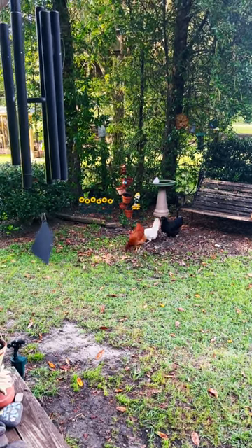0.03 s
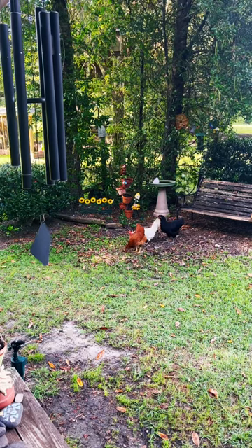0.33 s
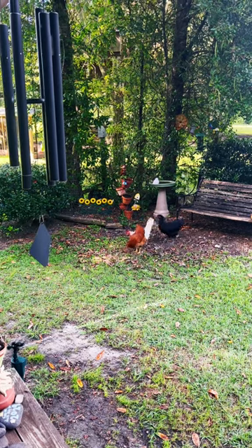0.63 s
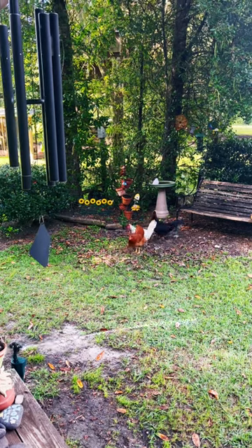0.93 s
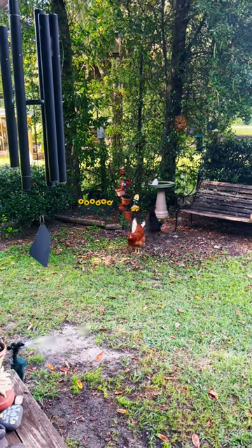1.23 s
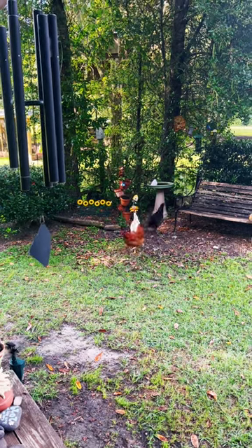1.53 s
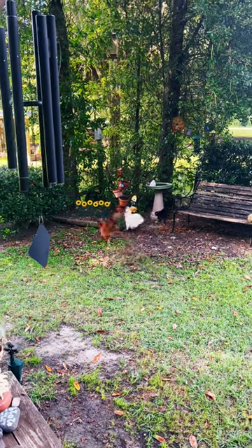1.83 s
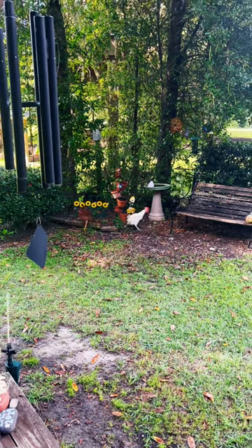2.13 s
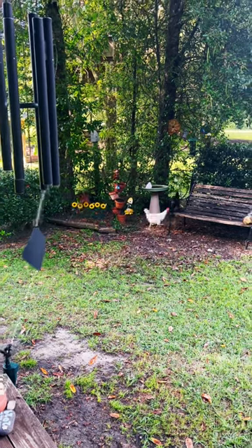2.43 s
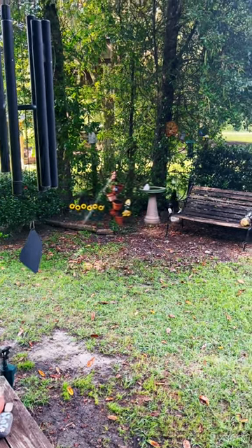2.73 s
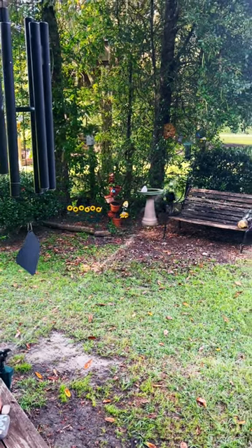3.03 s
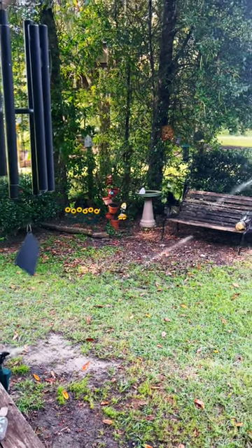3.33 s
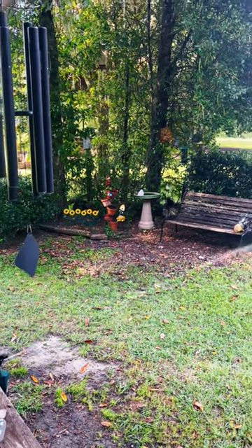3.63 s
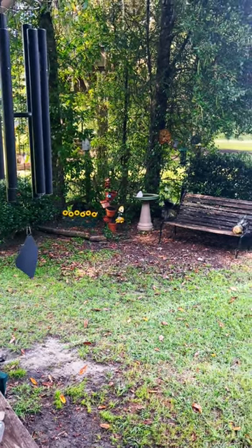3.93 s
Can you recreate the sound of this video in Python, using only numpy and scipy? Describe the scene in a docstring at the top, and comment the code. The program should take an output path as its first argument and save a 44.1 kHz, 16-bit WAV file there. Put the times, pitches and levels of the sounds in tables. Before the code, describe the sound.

An impact sprinkler starts with a clunk and a spurt on a backyard lawn, then ticks steadily over hissing water. It rattles quickly back in louder spray and resumes ticking. Drops patter on grass over a low rumble.

```python
"""A clunk and a spurt, over a low rumble and hum, as water enters an impact sprinkler on a back lawn.
Its sprung arm cuts the hissing jet and strikes the metal head about ten times a second; each impact
gives a click, a short ring and a burst of spray. A lever snaps over, the arm rattles quickly while
the head swings back, then the lever snaps again and the slow beat resumes. Drops patter on the grass."""
import sys
import numpy as np
from scipy import signal
from scipy.fft import rfft, irfft
from scipy.io import wavfile

SR = 44100
rng = np.random.default_rng(int(sys.argv[2]) if len(sys.argv) > 2 else 0)


def wav_out(sig):
    """Save sig, one row per channel (or a flat mono array), as 16-bit PCM at SR to the path in sys.argv[1]."""
    wavfile.write(sys.argv[1], SR, np.round(np.clip(np.atleast_2d(sig).T, -1, 1) * 32767).astype(np.int16))


N = 176400
TIME, BIN_HZ = np.arange(N) / SR, np.fft.rfftfreq(N, 1 / SR)

# slow blows of the arm: (time [s], relative click level [dB], ring level [dB], splash level [dB])
SLOW_BLOWS = [(0.3718, -27.5, -31.5, -34), (0.4629, -30, -30, -34), (0.5573, -28, -31, -31.5),
              (0.6506, -27.5, -29.5, -33), (0.744, -26, -34, -34.5), (0.8378, -25, -33, -34.5),
              (0.9305, -25, -33.5, -36), (1.0233, -23.5, -35.5, -32.5), (1.1177, -27.5, -38.5, -33),
              (1.6295, -23.5, -36, -32.5), (1.7218, -27.5, -37, -35), (1.817, -24, -38, -35),
              (1.9111, -27.5, -39, -35), (2.0057, -26, -37.5, -35), (2.1, -29, -36, -33.5),
              (2.1943, -25.5, -36, -35), (2.2882, -27.5, -36.5, -33), (2.3818, -26, -34, -34.5),
              (2.4756, -25.5, -34.5, -34), (2.5694, -24.5, -32, -33.5), (2.6634, -24.5, -33.5, -34),
              (2.7576, -27, -34, -36.5), (2.8521, -23.5, -33, -38.5), (2.9463, -24.5, -32, -33.5),
              (3.0402, -26, -33, -33), (3.1343, -22.5, -32, -36), (3.2284, -23, -32.5, -34),
              (3.3226, -23.5, -32, -34.5), (3.4167, -23, -33, -35), (3.5112, -21.5, -32.5, -34.5),
              (3.6056, -24.5, -31.5, -33.5), (3.6994, -27, -32, -33.5), (3.7939, -32, -32, -35.5),
              (3.8877, -33, -33, -32.5), (3.9824, -27.5, -33, -31.5)]
# quick blows while the head swings back: (time [s], relative click level [dB])
QUICK_BLOWS = [(1.1436, -26), (1.1672, -40), (1.1914, -28), (1.2148, -30), (1.237, -28.5), (1.2596, -29),
               (1.2831, -33), (1.3057, -29), (1.3292, -37), (1.352, -39), (1.3745, -41), (1.3962, -38),
               (1.42, -33), (1.4402, -37), (1.4625, -39), (1.4864, -35), (1.5082, -34)]
# snaps of the reversing lever: (time [s], relative click level [dB], splash level [dB])
LEVER_TRIPS = [(1.119, -24.5, -45), (1.5307, -21, -36.5)]
# the clunk as the water comes in: (time [s], relative knock level [dB], splash level [dB])
INLET_CLUNK = (.2358, -27, -45)


def amp(db):
    """Amplitude ratio of a level in decibels."""
    return 10 ** (np.asarray(db) / 20)


def unit(x):
    """Normalisation to an rms of one."""
    return x / np.sqrt(np.mean(x ** 2) + 1e-20)


def gain_curve(points):
    """Gain at each frequency bin, by interpolation of levels on a log-frequency axis."""
    hz, db = np.transpose(points)
    return amp(np.interp(np.log(BIN_HZ + 1), np.log(hz + 1), db))


def filtered(x, gain):
    """Linear filtering: the spectrum is multiplied by a gain, and the result has an rms of one."""
    return unit(irfft(rfft(x) * gain))


def drift(rate_hz):
    """Random fluctuation: low-pass Gaussian noise with an rms of one."""
    return filtered(rng.standard_normal(N), np.exp(-(BIN_HZ / rate_hz) ** 2))


def add(mix, s, sound):
    """Superposition of a sound on the mix, starting at s seconds."""
    part = mix[max(round(s * SR), 0):][:len(sound)]
    part += sound[:len(part)]


def struck(modes, spread_db, detune=0):
    """Free vibration: a sum of damped modes whose levels and tuning may vary from blow to blow."""
    t = np.arange(SR // 5) / SR
    out = np.zeros(len(t))
    for k, (hz, db, t60) in enumerate(modes):
        level_chance, pitch_chance = rng.standard_normal(2)
        envelope = amp(db + spread_db * level_chance - 60 * t / t60)
        out += (-1) ** k * envelope * np.sin(2 * np.pi * hz * (1 + detune * pitch_chance) * t)
    return out


def water_hiss(spectrum, grain_db, grain_hz, correlation=.7):
    """Breaking water radiates grainy, amplitude-modulated noise, partly coherent at two microphones."""
    a, b = rng.standard_normal((2, N))
    pair = np.array([a, correlation * a + np.sqrt(1 - correlation ** 2) * b])
    return filtered(pair * amp(grain_db * drift(grain_hz)), gain_curve(spectrum))


def background():
    """Low outdoor noise, and a distant machine's hum: partials modulated in amplitude and frequency."""
    # outdoor rumble: (frequency [Hz], relative spectral level [dB])
    rumble_spectrum = [(20, -41), (36, -29), (52, 2.5), (72, -0.5), (105, -0.5), (135, -6.5), (210, -2.5),
                       (275, -12.5), (350, -6), (480, -18.5), (1100, -22.5), (1500, -33.5), (2000, -40.5),
                       (4000, -41), (15000, -53)]
    # partials of the hum: (frequency [Hz], level [dB], rms frequency deviation [Hz])
    partials = [(57.7, -49, 2.91), (115.5, -59, 3.94), (169.8, -61.5, 1.62), (237.6, -53.5, 1.26),
                (345, -62.5, 4.86), (598, -70.5, 2.25), (932, -69, 1.7)]
    hum = np.zeros(N)
    for hz, db, waver_hz in partials:
        peak = np.sqrt(2) * amp(db + 2.3 * drift(10))
        hum += peak * np.sin(2 * np.pi * np.cumsum(hz + waver_hz * drift(8)) / SR)
    return hum + amp(-46) * filtered(rng.standard_normal((2, N)), gain_curve(rumble_spectrum))


def patter(drops_per_s=900, spread_db=4, fall_s=.007):
    """Shot noise: drops land on grass and leaves at random, each a brief decaying burst."""
    # drops on the lawn: (frequency [Hz], relative spectral level [dB])
    spectrum = [(250, -1.5), (500, -4), (780, 3), (1050, -3), (1400, 0), (2000, -4), (2700, -7),
                (5000, -19.5), (15000, -37)]
    # strength of the patter: (time [s], relative level [dB])
    levels = [(.15, -8.5), (.4, -3.5), (.6, -3), (1.1, 0), (1.29, 2), (1.35, 5.5), (1.52, 10), (1.58, 0.5),
              (2.5, -1.5), (3.0, 2), (3.55, -2), (4, -3.5)]
    impacts = (rng.random((2, N)) < drops_per_s / SR) * rng.standard_normal((2, N))
    impacts *= amp(spread_db * np.minimum(rng.exponential(1, (2, N)), 3))
    t = np.arange(SR // 50) / SR
    burst = rng.standard_normal((2, len(t))) * np.exp(-t / fall_s)
    drops = signal.fftconvolve(impacts, burst, axes=1)[:, :N]
    clumps = amp(np.interp(TIME, *np.transpose(levels)) + 2.6 * drift(27))
    return amp(-55.5) * clumps * filtered(drops, gain_curve(spectrum))


def splats(rise_s=.002, width_octaves=.6):
    """Larger gouts of water strike leaves and soil; each impact is a transient of band-limited noise."""
    # gouts landing: (time [s], level [dB], centre frequency [Hz], decay time constant [s])
    gouts = [(1.685, -40.5, 1300, 0.006), (1.880, -44, 1000, 0.0051), (1.957, -41.5, 1800, 0.013),
             (1.960, -43.5, 700, 0.0059), (2.535, -48, 1400, .014), (2.985, -44, 1150, 0.015),
             (3.540, -47, 856, 0.022)]
    out, t, hz = np.zeros((2, N)), np.arange(8192) / SR, np.fft.rfftfreq(8192, 1 / SR)
    for s, db, centre_hz, fall_s in gouts:
        band = np.exp(-.5 * (np.log2((hz + 1) / centre_hz) / width_octaves) ** 2)
        envelope = amp(db) * np.minimum(t / rise_s, 1) * np.exp(-t / fall_s)
        for channel in out:
            add(channel, s, envelope * filtered(rng.standard_normal(len(t)), band))
    return out


def jet(water_on_s=.31, rise_s=1, ring_on_s=.37, ring_hz=3460, ring_width_hz=174):
    """Jet noise grows as pressure builds; the nozzle whistles faintly in a narrow band."""
    # the free jet: (frequency [Hz], relative spectral level [dB])
    spectrum = [(300, -4), (1000, -3.5), (1900, -1), (2700, 9.5), (3350, 9.5), (4000, 4.5), (5200, 4.5),
                (6300, -6), (7800, 7), (9000, -6.5), (13000, -1), (15600, -49)]
    resonance = np.exp(-.5 * ((BIN_HZ - ring_hz) / ring_width_hz) ** 2)
    ring = amp(-53) * (TIME > ring_on_s) * filtered(rng.standard_normal((2, N)), resonance)
    onset = np.sqrt(np.clip((TIME - water_on_s) / rise_s, 0, 1))
    return ring + amp(-52 + 3.1 * drift(32)) * onset * water_hiss(spectrum, grain_db=3, grain_hz=450)


def splashes(rise_s=.0015, fall_s=.0079, mist_fall_s=.043, mist_db=-16.5):
    """The arm cuts the jet just before each blow; the bursts of spray are incoherent, so powers add."""
    # water torn up by one blow: (frequency [Hz], relative spectral level [dB])
    spectrum = [(300, -8), (900, -9.5), (1450, -4.5), (2100, -2.5), (2700, -0.5), (3300, 5), (4100, 2.5),
                (5100, 1), (6200, 3), (7800, 2), (11000, -2), (13300, 1), (14800, -14), (15700, -30)]
    first_spurt = amp(-41.5) * np.exp(-((TIME - .287) / .015) ** 2)
    power = first_spurt ** 2
    quick_splashes = [(s, -41) for s, _ in QUICK_BLOWS]
    for s, *_, db in [*SLOW_BLOWS, *LEVER_TRIPS, INLET_CLUNK, *quick_splashes]:
        after, before = np.maximum(TIME - s, 0), np.clip(s - TIME, 0, .1)
        burst = np.exp(-2 * np.minimum(after / fall_s, 20))
        mist = amp(mist_db) ** 2 * np.exp(-2 * after / mist_fall_s)
        power += amp(db + 6) ** 2 * (burst + mist) * np.exp(-2 * before / rise_s)
    flicker = amp(1.3 * drift(120))
    return np.sqrt(power) * flicker * water_hiss(spectrum, grain_db=3.5, grain_hz=900)


def return_spray(start_s=1.125, end_s=1.541, edge_s=.0023):
    """Continuous break-up of the jet gives unbroken noise while the head swings back."""
    # the fan of spray: (frequency [Hz], relative spectral level [dB])
    spectrum = [(300, -14), (900, -10), (1500, -1), (1950, -5.5), (2550, 2.5), (3300, 8), (3850, -7),
                (4200, 8), (4600, 6), (5080, 13), (5900, -7), (6800, 1.5), (8200, 3.5), (11000, -0.5),
                (13300, 3), (14900, -14), (15700, -33)]
    gate = (np.tanh((TIME - start_s) / edge_s) - np.tanh((TIME - end_s) / edge_s)) / 2
    return amp(-36) * gate * water_hiss(spectrum, grain_db=3, grain_hz=500)


def clunk():
    """Impulse excitation: the arriving pressure knocks the pipe once and its modes decay."""
    # modes of the pipe: (frequency [Hz], relative level [dB], T60 [s])
    pipe_modes = [(707, -16, .04), (874, -3.5, 0.03), (1070, 3, 0.0096), (1216, -11, 0.05),
                  (1497, 5, 0.011), (1450, -11, .05), (1545, -20, 0.12), (1640, -13, .13),
                  (2510, -15, 0.07), (2970, -14, 0.015)]
    out = np.zeros(N)
    s, db, _ = INLET_CLUNK
    add(out, s, amp(db) * struck(pipe_modes, spread_db=2.5))
    return out


def lever():
    """The reversing lever snaps over at each end of the return, exciting high, heavily damped modes."""
    # modes of the lever: (frequency [Hz], relative level [dB], T60 [s])
    lever_modes = [(3260, -23, 0.021), (4400, -13, 0.013), (5180, 2.5, 0.011), (6840, 2.5, .005),
                   (8600, -6, .005), (11300, -4, .003)]
    out = np.zeros(N)
    for s, db, _ in LEVER_TRIPS:
        add(out, s, amp(db) * struck(lever_modes, spread_db=1.5, detune=.01))
    return out


def arm(grit_s=.00034, min_bounce_s=.00035, bounce_db=-11):
    """Impact and rebound: each blow makes a gritty click, a second contact and a ring of the wet head."""
    # modes of the click of arm on head: (frequency [Hz], relative level [dB], T60 [s])
    click_modes = [(2220, -14.5, 0.0033), (3120, -9, 0.02), (3540, -13.5, 0.014), (3970, -10.5, 0.013),
                   (4770, -4.5, 0.0058), (7700, 3, 0.0038), (10090, -3, 0.0017), (12500, -7.5, 0.00096),
                   (14400, -10, 0.0017)]
    # modes of the head: (frequency [Hz], relative level aimed left [dB], aimed right [dB], T60 [s])
    head_modes = [(1446, -15.5, -19, 0.12), (2460, 15, -20, 0.041), (2530, -9, -16, 0.17),
                  (2968, -0.5, -6, 0.09), (3176, 5, -4, 0.11), (3230, 4.5, 3, 0.11), (3390, 4.5, 3.5, 0.11),
                  (3474, -4.5, 3, 0.12), (3610, -6, -4.5, 0.11), (3690, -11, -9, 0.11),
                  (4070, -9, -23, 0.082), (4980, -9, -3, 0.048), (5070, 5, -8, 0.083),
                  (8140, -27, -21, 0.07)]
    # where the head points: (time [s], aim [0 left to 1 right])
    aim_path = [(.37, 0.87), (1.12, 1), (1.53, 0), (4, .7)]
    out, t = np.zeros(N), np.arange(SR // 5) / SR
    rattle = [(s, db, -46.5) for s, db in QUICK_BLOWS]  # quick blows ring only faintly
    for s, click_db, ring_db, *_ in [*SLOW_BLOWS, *rattle]:
        aim = np.interp(s, *np.transpose(aim_path))
        aimed_modes = [(hz, left + aim * (right - left), t60) for hz, left, right, t60 in head_modes]
        contact = struck(click_modes, spread_db=1.5, detune=.017)
        grit = .18 * rng.standard_normal(len(t)) * np.exp(-t / grit_s)
        click = amp(click_db + 6.3) * (contact + grit)
        ring = amp(ring_db - 4.5) * struck(aimed_modes, spread_db=1.8, detune=.006)
        add(out, s, click + ring)
        add(out, s + min_bounce_s * (1 + rng.random()), amp(bounce_db) * click)
    return out


def yard(x, tails=3, tail_db=-8, t60_s=.16):
    """Reflection and scattering: direct sound, near echoes and short tails that slowly cross-fade."""
    # echoes from the deck and the house: (delay [s], level [dB])
    echoes = [(.0021, -18), (.0056, -21)]
    t = np.arange(SR // 3) / SR
    taps = np.zeros(len(t))
    taps[0] = 1
    for delay, db in echoes:
        taps[round(delay * SR)] += amp(db)
    out = signal.fftconvolve(x, taps[None], axes=1)[:, :N]
    for k in range(tails):
        scatter = rng.standard_normal((2, len(t))) * (rng.random((2, len(t))) < .1)
        tail = scatter * amp(-60 * t / t60_s) * (t > .002)
        tail /= np.linalg.norm(tail[0])
        fade = np.sqrt(2 / tails) * np.cos(np.pi * (TIME * (k + 1) + k / tails))  # as if the head turns
        out += amp(tail_db) * signal.fftconvolve(x * fade, tail, axes=1)[:, :N]
    return out


def scene():
    """Superposition of the sprinkler, its water and the garden at two microphones."""
    sprinkler = arm() + lever() + clunk() + splashes() + return_spray()
    return yard(sprinkler) + jet() + patter() + splats() + background()


def record(dry, cutoff_hz=16000):
    """Mid-side stereo: the two microphones feed mid and side by turns along the spectrum; then a low-pass."""
    # phase between the two sides: (frequency [Hz], phase [rad])
    phases = [(20, .03), (100, .12), (270, .45), (500, 1.0), (1200, .85), (1800, 1.1), (2300, 2.2),
              (2600, 2.75), (2950, 2.0), (3300, 1.8), (4100, 1.3), (5100, 1.4), (6080, 3.14), (8100, 6.28),
              (10250, 9.42), (12400, 12.57), (14600, 15.7), (16500, 18.4)]
    # gain of the side signal: (frequency [Hz], level [dB])
    side_levels = [(40, -2), (125, -4.5), (270, 0), (500, 4), (1000, -4), (2000, 0.5), (4000, -3.5),
                   (5200, -3), (6000, 1), (8000, 2), (12000, 3), (16000, 3)]
    # left minus right: (frequency [Hz], level difference [dB])
    balance = [(60, -.1), (125, -1), (300, -1.6), (600, -.5), (1200, .5), (2700, -2.8), (4200, -1.8),
               (5800, 0), (15000, 0)]
    half_phase = np.interp(BIN_HZ, *np.transpose(phases)) / 2
    first, second = rfft(dry)
    mid = np.cos(half_phase) * first
    side = 1j * np.sin(half_phase) * second * gain_curve(side_levels)
    lean = np.sqrt(gain_curve(balance))
    stereo = irfft(np.array([(mid + side) * lean, (mid - side) / lean]), N)
    low_pass = signal.firwin(255, cutoff_hz, window=("kaiser", 9), fs=SR)
    return signal.oaconvolve(stereo, low_pass[None], "same")


dry = scene()
out = record(dry)
wav_out(out)
```